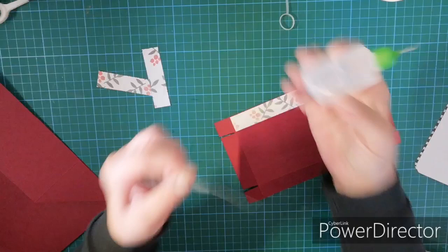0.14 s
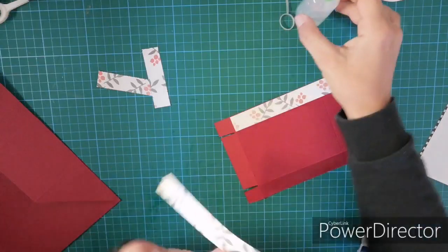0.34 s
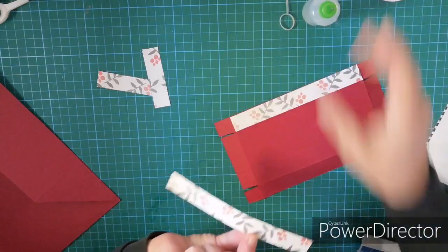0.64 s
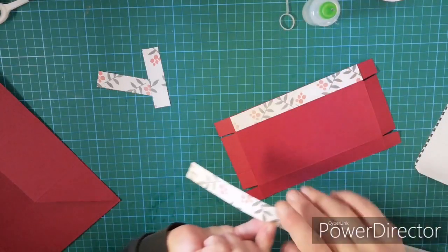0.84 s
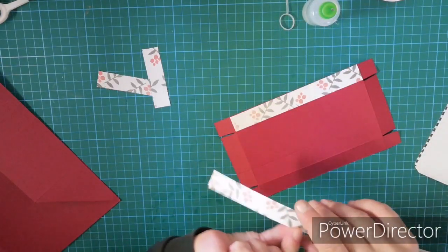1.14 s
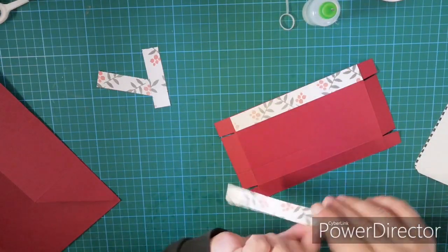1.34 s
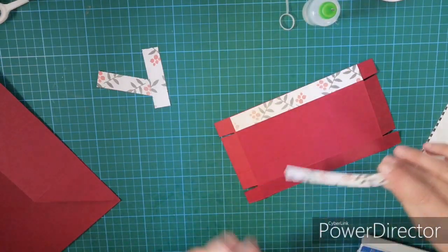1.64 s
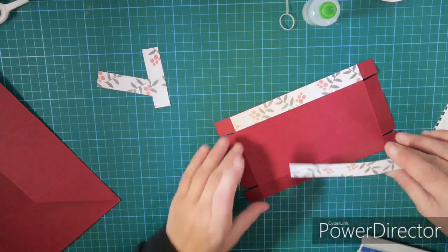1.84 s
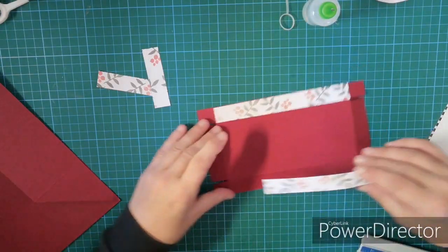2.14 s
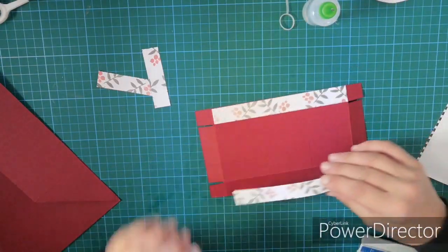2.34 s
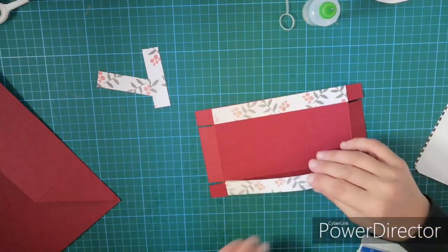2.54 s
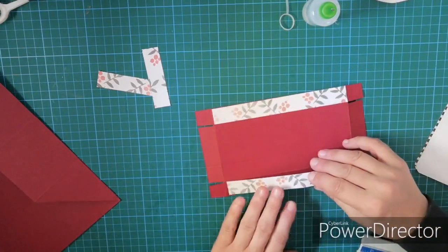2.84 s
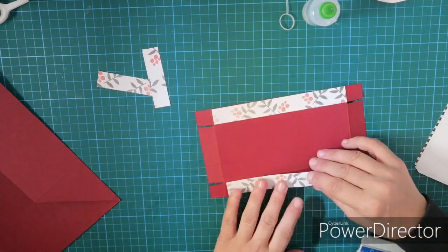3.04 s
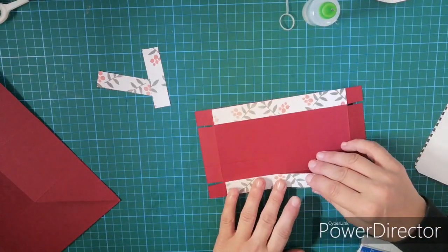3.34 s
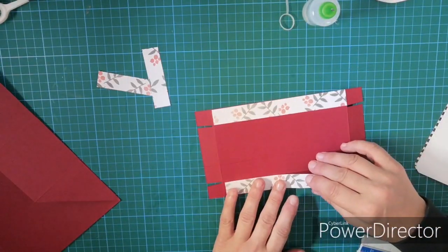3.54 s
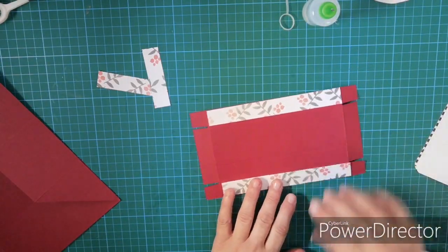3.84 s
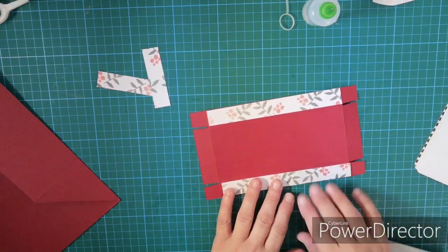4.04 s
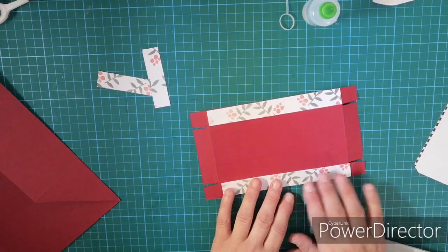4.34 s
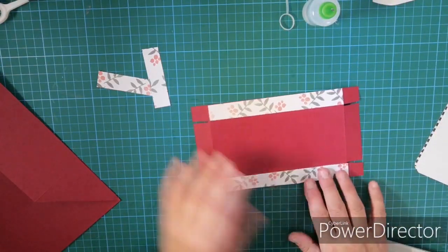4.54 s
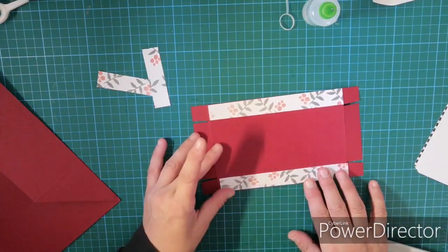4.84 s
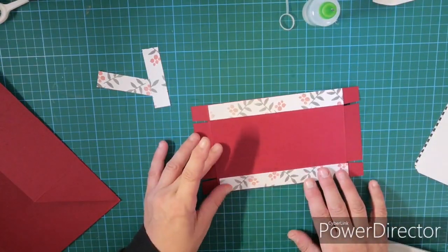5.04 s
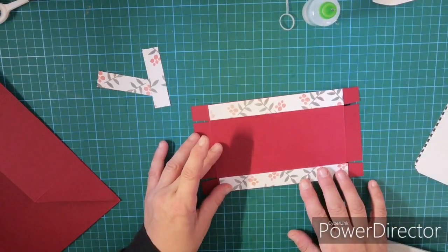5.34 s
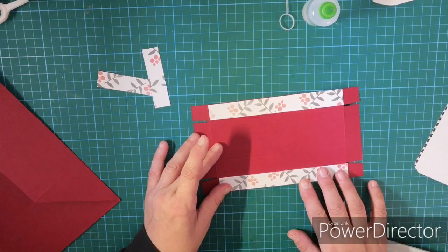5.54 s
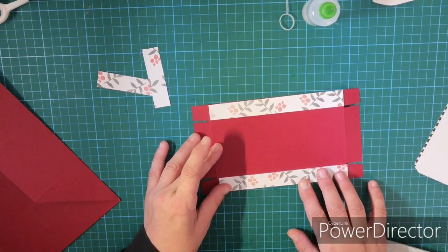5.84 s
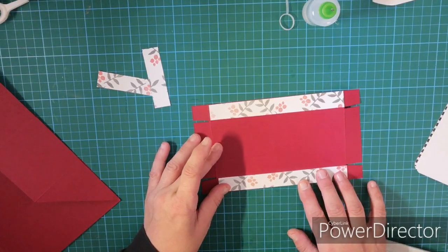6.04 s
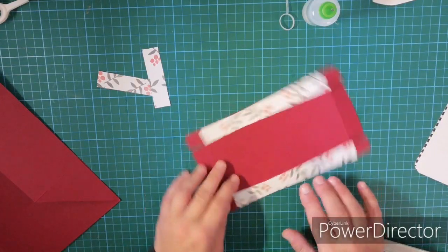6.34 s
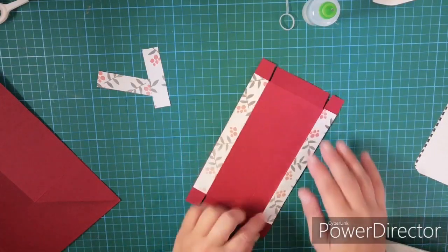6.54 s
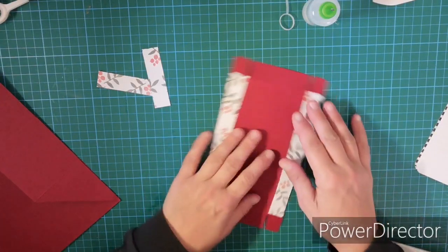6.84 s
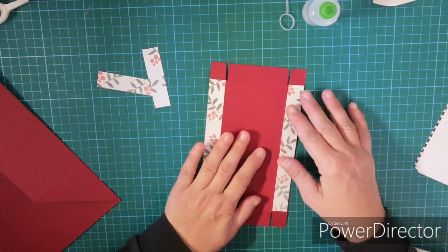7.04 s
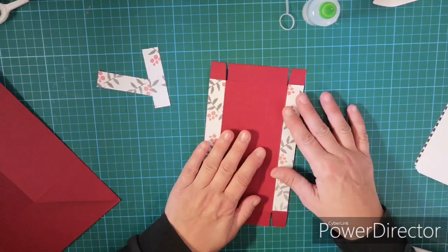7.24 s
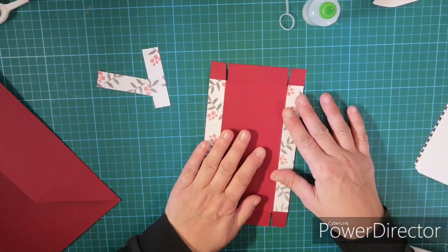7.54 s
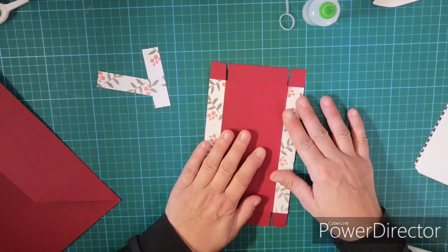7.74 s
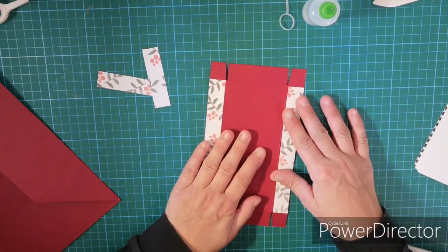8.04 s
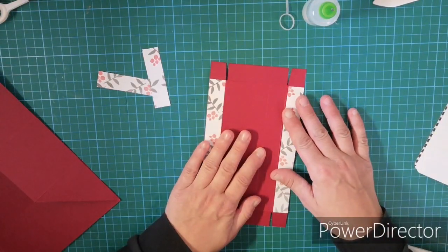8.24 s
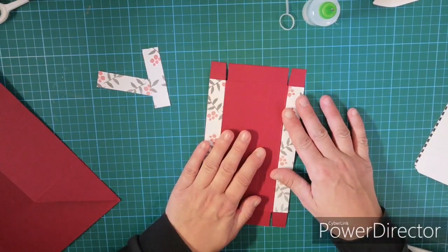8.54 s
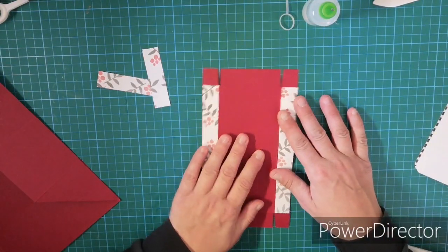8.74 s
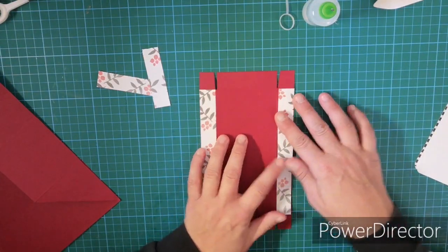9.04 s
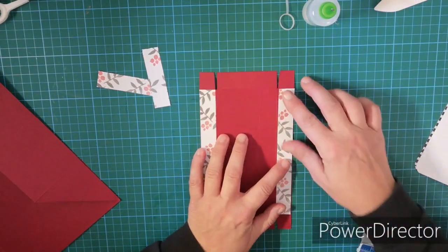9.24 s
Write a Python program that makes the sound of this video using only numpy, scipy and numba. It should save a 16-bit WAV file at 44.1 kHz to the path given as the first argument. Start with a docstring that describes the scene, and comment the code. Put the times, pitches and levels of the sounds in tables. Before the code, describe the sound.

At a table in a small room, a plastic bottle is set down with a sharp clunk and rocks to rest. A swelling scrape of card ends crisply, then a tick and a cluster of soft finger pats press the paper. After a quiet pause, card swishes round with a burst of snappy edge flicks, then faint rubs. The close microphone picks up low hum and soft hiss.

```python
"""A table in a small room: paper craft, heard from a microphone on an arm above the cutting mat.
A plastic glue bottle lands and rocks to rest: blows and clicks set its resonances ringing.
Card, fingers and a sleeve slide (tiny random friction grains), fingers tap (noise bursts and table thuds),
short dry ticks snap and ring, mostly from paper edges, and fingertips creep (narrow swells of noise).
The arm hums and drones (noise through narrow resonances) over a soft hiss of room air."""
import sys
import numpy as np
from scipy import signal
from scipy.fft import rfft, irfft
from scipy.io import wavfile
from scipy.ndimage import uniform_filter1d
from numba import njit

SR = 44100
rng = np.random.default_rng(int(sys.argv[2]) if len(sys.argv) > 2 else 0)


def master(y):
    """Save y as 16-bit WAV."""
    cut = np.clip(np.atleast_2d(y).T, -1, 1)
    pcm = np.round(cut * 32767)  # scale
    wavfile.write(sys.argv[1], SR, pcm.astype(np.int16))


N = 414094  # length in samples, about 9.4 s

# Levels in the tables are relative: the functions add their own trims.
# room air, its spectrum: pitch_hz, level_db (per Hz)
AIR_SPECTRUM = [(35, -26.5), (60, 2.5), (69, -5), (81, -10.5), (145, -21.5), (215, -29), (326, -34),
                (484, -47), (844, -43), (970, -42.5), (1620, -39), (2630, -40.5), (3020, -44.5),
                (6810, -50), (15300, -58.5)]
# microphone arm shaking with the table, low hum: pitch_hz, width_hz, level_db
HUM_MODES = [(49.24, 3.63, -1.5), (24.6, 3.9, -11.5), (70.5, 2.4, -16), (108.2, 18, -19)]
# the drone above it: pitch_hz, width_hz, level_db
DRONE_RESONANCES = [(104.6, 83, -2.5), (154.2, 13, 1), (181.3, 15.3, -0.5), (232.3, 50, -12.5)]
# how the hum rises and falls: time_s, level_db
HUM_CURVE = [(0.0, -54.5), (0.86, -50.5), (1.04, -59.5), (1.38, -53.5), (1.56, -61), (1.91, -51),
             (2.43, -58), (3.12, -51), (3.64, -55.5), (3.99, -46), (4.34, -57.4), (6.25, -57), (6.6, -50),
             (7.12, -51.5), (7.81, -49.0), (8.16, -58.5), (8.51, -51.5), (9.38, -52)]
# how the drone rises and falls: time_s, level_db
DRONE_CURVE = [(0.0, -73), (2.95, -70.5), (3.47, -64), (3.82, -72.3), (4.34, -55.5), (4.51, -67),
               (4.86, -62.5), (5.03, -70), (5.38, -58.5), (5.55, -67.5), (6.42, -67.5), (6.94, -53.5),
               (7.64, -68), (7.99, -55.5), (8.33, -63), (8.68, -61.5), (8.85, -68), (9.38, -58)]
# side (difference) against mid (common) sound at the two microphone ports: pitch_hz, level_db
ROOM_SIDE = [(30, -34.5), (60, -33), (110, -19), (200, -12.5), (380, 2), (700, 3.5), (1300, -3.5),
             (2400, 0.5), (15000, 1)]
# the same for the sliding sounds: pitch_hz, level_db
SLIDE_SIDE = [(100, -1), (700, 3.5), (1300, -15), (2400, -8.5), (4400, -0.5), (15000, 0)]
# left port against right for the sliding sounds: pitch_hz, level_db
SLIDE_BALANCE = [(60, -21), (110, -10), (200, -24), (380, 10.5), (700, -0.5), (1280, 1.5), (2370, -1.5),
                 (4370, 0.5), (8060, -4), (14900, 7.5)]
# fingertips creeping on the paper: middle_s, level_db, pitch_hz
CREEPS = [(3.18, -76.5, 2600), (3.256, -77.5, 2700), (3.329, -78, 2700), (3.42, -76, 2780),
          (3.631, -74.5, 2810), (3.835, -72, 2750), (4.53, -76, 2750), (4.885, -78, 2720),
          (4.95, -76, 2720), (6.33, -75.5, 2650), (7.795, -78, 2760)]
# paper edges flicking, with a fingernail or joint click (5.35 s) and a hand landing on the card (2.04 s):
# start_s, snap_db, edge_db, ring_hz, length_s
DRY_TICKS = [(0.017, -41.5, -48.5, 2490, 0.0018), (0.066, -46, -52.5, 2880, 0.013),
             (1.473, -45, -58, 2380, 0.01), (2.0408, -26, -52, 1940, 0.0091),
             (2.154, -50, -45, 2890, 0.004), (2.656, -42.5, -56, 2350, 0.0088),
             (3.8904, -26.5, -49, 1600, 0.0021), (4.4447, -43, -62, 2200, 0.004),
             (4.561, -45, -65, 2510, 0.004), (4.945, -67, -67, 2560, 0.0044),
             (5.35, -23, -47.5, 1430, 0.0012), (6.287, -58, -63, 1780, 0.003),
             (6.482, -33, -61, 2880, 0.0024), (6.843, -34, -53, 2560, 0.004),
             (6.853, -23.5, -42, 2900, 0.0072), (6.89, -24.5, -39, 2570, 0.0046),
             (6.91, -28, -44, 3630, 0.0036), (7.226, -39, -61, 3600, 0.012),
             (7.484, -42, -65, 1490, 0.0061), (8.794, -48, -58.5, 3640, 0.0023)]
# colour of the snap in a tick: pitch_hz, level_db
SNAP_COLOUR = [(100, -34), (500, -29), (850, -7.5), (1350, -3), (1900, -0.5), (2700, -2), (3600, -3),
               (4500, -14.5), (8000, -28), (15000, -61)]
# card, fingers and sleeve sliding (the first faint stroke is a sleeve swish):
# start_s, length_s, swell_s, fade_s, rasp_db, hiss_db, first_hz, last_hz (resonance at start and end)
SLIDE_STROKES = [ (0.175, 0.21, 0.062, 0.039, -76.5, -76, 2050, 2290),
                 (1.452, 0.32, 0.02, 0.18, -82, -76.5, 2250, 2500),
                 (2.059, 0.25, 0.27, 0.011, -40, -43.5, 2920, 2730),
                 (2.665, 0.4, 0.084, 0.065, -76, -75.5, 2400, 2200),
                 (3.73, 0.022, 0.025, 0.011, -75, -75.5, 2550, 2550),
                 (3.852, 0.085, 0.052, 0.015, -55.5, -60.5, 2700, 2830),
                 (4.539, 0.049, 0.048, 0.035, -55, -65.5, 2720, 2500),
                 (4.603, 0.19, 0.057, 0.048, -72.5, -69, 2350, 2510),
                 (4.95, 0.04, 0.024, 0.047, -86, -77.5, 2650, 2650),
                 (5.932, 0.18, 0.046, 0.04, -84, -89, 2720, 2700),
                 (6.375, 0.27, 0.15, 0.011, -40.5, -39.5, 2900, 2450),
                 (6.64, 0.188, 0.02, 0.02, -63.5, -63, 2430, 2420),
                 (6.872, 0.17, 0.1, 0.02, -46.5, -44.5, 2980, 3320),
                 (7.63, 0.14, 0.022, 0.02, -85, -78.5, 2500, 2650),
                 (8.789, 0.085, 0.11, 0.048, -57.5, -57, 3200, 3600),
                 (8.988, 0.049, 0.046, 0.03, -83, -68, 2690, 2600),
                 (9.15, 0.18, 0.012, 0.062, -78.5, -76, 2000, 2600)]
# coarse friction: pitch_hz, level_db
RASP_COLOUR = [(100, -18), (500, -21.5), (900, -8.5), (1250, -6.5), (1600, 5.5), (2100, 4.5), (2500, 5),
               (3300, 6), (3800, -3), (5000, 0.5), (15000, -75)]
# fine friction of the fibres: pitch_hz, level_db
HISS_COLOUR = [(100, -77.5), (2500, -23), (3800, -3.5), (4600, -4), (5700, 2.5), (6200, -1.5), (7000, 1),
               (7900, -3.5), (8400, -6.5), (9700, -6.5), (11300, -11), (13000, -18), (15000, -35)]
# fingers and palm landing on the card: start_s, slap_db, thud_db, brightness_hz, contact_s
FINGER_TAPS = [(3.93, -47, -78, 6950, 0.015), (3.957, -27, -47, 3440, 0.026),
               (3.984, -55, -49.5, 2500, .012), (4.049, -22.5, -38, 2240, 0.021),
               (4.172, -26.5, -41, 1990, 0.026), (4.838, -82, -54, 900, 0.014),
               (6.287, -57.5, -57.5, 2520, 0.0097), (6.383, -52, -49, 500, 0.0092),
               (6.901, -38, -35.5, 600, 0.0061), (6.928, -39, -43, 400, 0.014),
               (9.125, -39.5, -49.5, 3960, 0.033), (9.32, -51, -59.5, 1110, 0.0041)]
# slap of skin on card: pitch_hz, level_db
SLAP_COLOUR = [(60, -9), (200, -0.5), (420, 4.5), (600, -0.5), (1000, 6.5), (1400, 5), (1900, 6.5),
               (2700, 1), (4000, -0.5), (7000, 1.5), (11000, -3), (15000, -23)]
# table top under a soft blow: pitch_hz, level_db, t60_s (time to fall by 60 dB)
TABLE_RESONANCES = [(45.4, -0.5, 0.6), (83, -1, 0.21), (111.4, 4.5, 0.26), (131.8, -11.5, 0.77),
                    (160, -9.5, 0.24), (194, -2.5, 0.087), (212, -3.5, .2), (278, -11, 0.19),
                    (385, -29, 0.41)]
# bottle base meeting the table: start_s, thump_db, click_db, brightness_hz
BOTTLE_CONTACTS = [(0.5633, -19.5, -13, 8800), (0.5896, -28.5, -21.5, 2500), (0.6014, -30.5, -42, 2000),
                   (0.640, -40, -27, 1500), (0.657, -52, -27.5, 1200), (0.7044, -43.5, -46, 1200),
                   (0.709, -43, -51, 800), (0.7286, -45.5, -55, 600), (0.742, -52.5, -58, 600),
                   (0.783, -61, -55, 800)]
# bottle ringing on the table: pitch_hz, level_db, t60_s
BOTTLE_RESONANCES = [(56.7, -12, 0.23), (110.9, -15, 0.11), (176.6, -59, .1), (219.3, -9.5, 0.27),
                     (241.3, -4.5, 0.15), (290, -7.5, 0.068), (316, -11.5, 0.12), (341, -18, 0.26),
                     (374, -38, 0.14), (690, -20, 0.038), (903, -15, 0.12), (1010, -34, 0.15)]
# hard contact of the bottle base: pitch_hz, level_db
CLICK_COLOUR = [(60, -18), (300, 14.5), (550, -5), (900, -3.5), (1300, -12), (2300, -6), (3100, -15.5),
                (5000, -14.5), (7000, -18.5), (8200, -31), (10000, -39), (15000, -36)]

AIR_DB = -76.5  # level of the air above 500 Hz
CUTOFF_HZ = 15400
SWELL_POWER, HISS_POWER = 0.88, 1.12  # how the speed builds up; how the hiss follows the speed
PRESSURE_DB, PRESSURE_PER_S = 1.5, 35  # unsteadiness of the hand: spread, turns a second


def from_db(db):
    """Turn decibels into gain."""
    return 10 ** (np.asarray(db) / 20)


def rms_one(x):
    """Scale to an average (rms) level of one."""
    return x / np.sqrt(np.mean(x ** 2) + 1e-20)


def in_time(rows):
    """Draw a (time_s, value) curve at every sample."""
    return np.interp(np.arange(N) / SR, *np.transpose(rows))


def add(track, s, sound):
    """Mix a sound into the track at time s."""
    at = round(s * SR)
    track[at:at + len(sound)] += sound[:N - at]


def cut(x, hz, kind, order=2):
    """Keep the low, high or middle part of a sound with a Butterworth filter."""
    return signal.sosfilt(signal.butter(order, hz, kind, fs=SR, output="sos"), x)


def colour(x, points, size=4096):
    """Filter to a (pitch_hz, level_db) spectrum, with the energy as early as possible (minimum phase)."""
    hz, db = np.transpose(points)
    grid = np.arange(size // 2 + 1) * SR / size
    gain = from_db(np.interp(np.log(grid + 1), np.log(hz), db))
    # Folding the cepstrum forward in time gives the minimum-phase response.
    cepstrum = irfft(np.log(gain))
    cepstrum[1:size // 2] *= 2
    cepstrum[size // 2 + 1:] = 0
    response = irfft(np.exp(rfft(cepstrum)))
    return signal.oaconvolve(x, response)[:len(x)]


def even(burst, over_hz=150):
    """Even out the chance peaks and holes in a noise burst's spectrum; unit energy."""
    length = burst.shape[-1]
    spectrum = rfft(burst, 2 * length)
    power = uniform_filter1d(np.abs(spectrum) ** 2, int(2 * length * over_hz / SR) + 1)
    out = irfft(spectrum / np.sqrt(power))[..., :length]
    return out / np.linalg.norm(out, axis=-1, keepdims=True)


def ring(force, modes):
    """Each blow sets every resonance ringing as a fading sine."""
    t = np.arange(SR) / SR
    response = np.zeros(SR)
    for hz, db, t60 in modes:
        fade = np.exp(-np.log(1000) * t / t60)
        response += from_db(db) * np.sin(2 * np.pi * hz * t) * fade
    return signal.oaconvolve(force, response)[:N]


def contact(length_s, crunch):
    """One sharp touch and the fading crunch of noise that follows; unit energy."""
    t = np.arange(SR // 10) / SR
    burst = rng.standard_normal(len(t)) * np.exp(-t / length_s)
    burst *= crunch / np.linalg.norm(burst)
    burst[0] = 1
    return even(burst)


def ports(mid, side, width):
    """Two close ports share the mid sound; the side is added to one and taken from the other."""
    return mid + colour(side, width) * np.array([[1], [-1]])


def lean(pair, balance):
    """Share a left-right difference between the two ports, half to each."""
    left, right = pair
    left = colour(left, [(hz, db / 2) for hz, db in balance])
    right = colour(right, [(hz, -db / 2) for hz, db in balance])
    return np.array([left, right])


def direct(x, scatter_s=0.00021, side_db=-1):
    """Sound bends round the microphone's body, so its two ports hear a click slightly differently."""
    t = np.arange(SR // 200) / SR
    scatter = rng.standard_normal(len(t)) * np.exp(-t / scatter_s)
    side = signal.oaconvolve(x, scatter / np.linalg.norm(scatter))[:N]
    return ports(x, from_db(side_db) * side, ROOM_SIDE)


def room(x, t60=0.3, treble_t60=0.41, treble_hz=3500, early_s=0.0068, early_db=5, gap_s=0.0018, wall_hz=9000):
    """Dense early echoes off the table and nearby things, then a small-room tail, longer in the treble."""
    t = np.arange(SR // 2) / SR
    noise = rng.standard_normal((2, len(t)))
    low = cut(noise, treble_hz, "low", order=1)
    low_tail = low * np.exp(-np.log(1000) * t / t60)
    treble_tail = (noise - low) * np.exp(-np.log(1000) * t / treble_t60)
    early = from_db(early_db) * noise * np.exp(-t / early_s)
    echoes = (low_tail + treble_tail + early) * (t > gap_s)
    mid, side = cut(even(echoes), wall_hz, "low", order=1)
    return signal.oaconvolve(x[None], ports(mid, side, ROOM_SIDE), axes=1)[:, :N]


def tremble(modes, even_s):
    """Random shaking heard through narrow resonances, its level evened to one."""
    x = np.zeros(N)
    for hz, width, db in modes:
        noise = rng.standard_normal(N + SR)
        # The first second is dropped so that the resonance is already going.
        shaking = cut(noise, [hz - width / 2, hz + width / 2], "band")[SR:]
        x += from_db(db) * rms_one(shaking)
    return x / np.sqrt(uniform_filter1d(x ** 2, int(even_s * SR) + 1) + 1e-6)


def background(hum_db=-0.12, drone_db=-0.9, rumble_db=-3):
    """The microphone arm hums and drones over the soft hiss of the room."""
    pair = []
    for part in ("mid", "side"):
        hum = from_db(in_time(HUM_CURVE) + hum_db) * tremble(HUM_MODES, even_s=0.17)
        drone = from_db(in_time(DRONE_CURVE) + drone_db) * tremble(DRONE_RESONANCES, even_s=0.2)
        air = colour(rng.standard_normal(N), AIR_SPECTRUM)
        air = colour(air, [(150, rumble_db), (300, 0.014)])
        air = air / np.std(cut(air, 500, "high", order=4))
        pair.append(hum + drone + from_db(AIR_DB) * air)
    return ports(*pair, ROOM_SIDE)


def squeaks(length_s=0.051, width_hz=600, hiss_db=-4, room_db=-4):
    """A pressed fingertip creeps a little: a short narrow swell of friction with some hiss."""
    out = np.zeros(N)
    swell = np.hanning(int(length_s * SR) + 3)
    for s, db, hz in CREEPS:
        noise = rng.standard_normal(SR // 4)
        tone = cut(noise, [hz - width_hz / 2, hz + width_hz / 2], "band", order=1)
        rub = rms_one(tone) + from_db(hiss_db) * rms_one(colour(noise, HISS_COLOUR))
        add(out, s - length_s / 2, from_db(db) * swell * rub[:len(swell)])
    return direct(out) + from_db(room_db) * room(out)


def ticks(snap_db=8, edge_db=22, ring_db=5, ring_width=0.1, room_db=-2, top_hz=10500):
    """A short dry tick, such as a paper edge flicking free: a snap that rings briefly, with a crisp top."""
    snaps, edges = np.zeros((2, N))
    for s, level_db, crisp_db, hz, length_s in DRY_TICKS:
        snap = contact(length_s, crunch=4.3)
        band = hz * np.exp([-ring_width, ring_width])
        snap = snap + from_db(ring_db) * cut(snap, band, "band", order=1)
        add(snaps, s, from_db(level_db + snap_db) * snap)
        add(edges, s, from_db(crisp_db + edge_db) * contact(length_s, crunch=6.6))
    out = colour(snaps, SNAP_COLOUR) + cut(colour(edges, HISS_COLOUR), top_hz, "low")
    return direct(out) + from_db(room_db) * room(out)


def grains(per_s, spread_db):
    """Fibres catch and slip at random, a few much harder than the rest."""
    hardness = np.minimum(rng.exponential(1, N), 4)
    sizes = from_db(spread_db * hardness) * rng.standard_normal(N)
    return rms_one(sizes * (rng.random(N) < per_s / SR))


@njit
def moving_resonance(x, turn, r):
    """A resonance whose pitch (turn, radians a sample) moves; gain about 1 at its peak."""
    y = np.zeros(len(x))
    for i in range(2, len(x)):
        push = (1 - r * r) / 2 * (x[i] - x[i - 2])
        y[i] = push + 2 * r * np.cos(turn[i]) * y[i - 1] - r * r * y[i - 2]
    return y


def drift(per_s):
    """Smooth chance with about per_s turns a second; rms one."""
    return rms_one(np.interp(np.arange(N) / SR * per_s, np.arange(2000), rng.standard_normal(2000)))


def sliding():
    """Strokes gather speed and die away; the resonance shifts, as when a card bends and turns."""
    t = np.arange(N) / SR
    rasp, hiss, weighted_hz = np.zeros((3, N))
    for s, length_s, swell_s, stop_s, rasp_db, hiss_db, first_hz, last_hz in SLIDE_STROKES:
        age = t[:int((length_s + 10 * stop_s) * SR)]
        swell = np.sin(np.pi / 2 * np.minimum(age / swell_s, 1)) ** SWELL_POWER
        speed = swell * np.exp(-np.maximum(age - length_s, 0) / stop_s)
        stroke_hz = np.interp(age, [0, length_s], [first_hz, last_hz])
        add(rasp, s, from_db(rasp_db) * speed)
        add(hiss, s, from_db(hiss_db) * speed ** HISS_POWER)
        add(weighted_hz, s, from_db(rasp_db) * speed * stroke_hz)
    pressure = from_db(PRESSURE_DB * drift(PRESSURE_PER_S))
    moving = rasp > 0
    # Where strokes overlap, the louder one counts more towards the resonance.
    resonance_hz = np.interp(t, t[moving], weighted_hz[moving] / rasp[moving])
    return rasp * pressure, hiss * pressure, resonance_hz


def slides(rasp_db=-1, hiss_db=-1, ring_db=2, ring_width_hz=700, room_db=-9, drag_db=-14, drag_power=1.28):
    """Friction grains: a rasp round a moving resonance, a fine fibre hiss, and a drag that shakes the table."""
    rasp_gain, hiss_gain, resonance_hz = sliding()
    turn = 2 * np.pi * resonance_hz / SR
    radius = np.exp(-np.pi * ring_width_hz / SR)
    pair = []
    for part in ("mid", "side"):
        rasp = colour(grains(per_s=5000, spread_db=1), RASP_COLOUR)
        rasp = rasp + from_db(ring_db) * moving_resonance(rasp, turn, radius)
        hiss = colour(grains(per_s=23000, spread_db=2.0), HISS_COLOUR)
        rasp = from_db(rasp_db) * rasp_gain * rms_one(rasp)
        hiss = from_db(hiss_db) * hiss_gain * rms_one(hiss)
        pair.append(rasp + hiss)
    peak = hiss_gain.max()
    drag_gain = from_db(drag_db) * peak * (hiss_gain / peak) ** drag_power
    drag = drag_gain * tremble(DRONE_RESONANCES, even_s=0.16)
    friction = ports(*pair, SLIDE_SIDE) + from_db(room_db) * room(pair[0])
    return lean(friction, SLIDE_BALANCE) + drag


def taps(slap_db=18, thud_db=-3, slap_room_db=-2, thud_room_db=-10, pad_hz=450, slip_db=-17, slip_s=0.022):
    """A finger slaps the card flat, its soft pad thuds into the table, and it slips a little."""
    slaps, blows, slips = np.zeros((3, N))
    t = np.arange(SR // 5) / SR
    for s, level_db, weight_db, bright_hz, length_s in FINGER_TAPS:
        slap = cut(contact(length_s, crunch=3.9), bright_hz, "low")
        add(slaps, s, from_db(level_db + slap_db) * slap)
        add(blows, s, from_db([weight_db + thud_db]))
        slip = rng.standard_normal(len(t)) * t * np.exp(-t / slip_s)
        add(slips, s, from_db(level_db + slap_db + slip_db) * slip / np.linalg.norm(slip))
    slap = colour(slaps, SLAP_COLOUR) + colour(slips, HISS_COLOUR)
    thud = ring(cut(blows, pad_hz, "low", order=1), TABLE_RESONANCES)
    return direct(slap + thud) + room(from_db(slap_room_db) * slap + from_db(thud_room_db) * thud)


def bottle(click_db=16, thump_room_db=-10, soft_hz=1500):
    """The bottle lands, rocks on its base and settles; later contacts are mostly softer and duller."""
    blows, clicks = np.zeros((2, N))
    for s, blow_db, tick_db, bright_hz in BOTTLE_CONTACTS:
        add(blows, s, from_db([blow_db]))
        click = cut(contact(length_s=0.0014, crunch=1.35), bright_hz, "low", order=1)
        add(clicks, s, from_db(tick_db + click_db) * click)
    thump = -ring(cut(blows, soft_hz, "low", order=1), BOTTLE_RESONANCES)
    click = colour(clicks, CLICK_COLOUR)
    return direct(thump + click) + room(from_db(thump_room_db) * thump + click)


def scene():
    """Everything on the table, and the room."""
    return background() + squeaks() + ticks() + slides() + taps() + bottle()


def record(dry):
    """Cut the top steeply above CUTOFF_HZ."""
    return signal.sosfilt(signal.ellip(10, .1, 80, CUTOFF_HZ, fs=SR, output="sos"), dry)


dry = scene()
out = record(dry)
master(out)
```